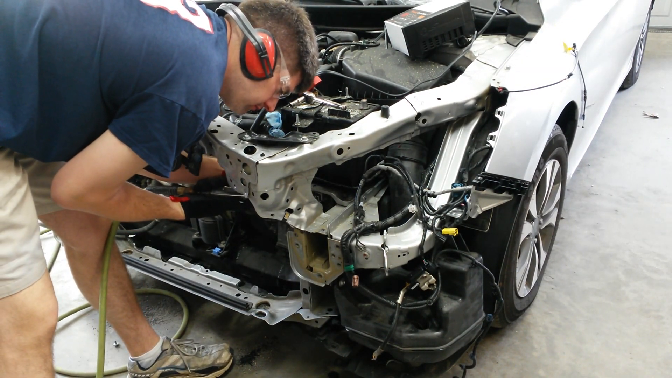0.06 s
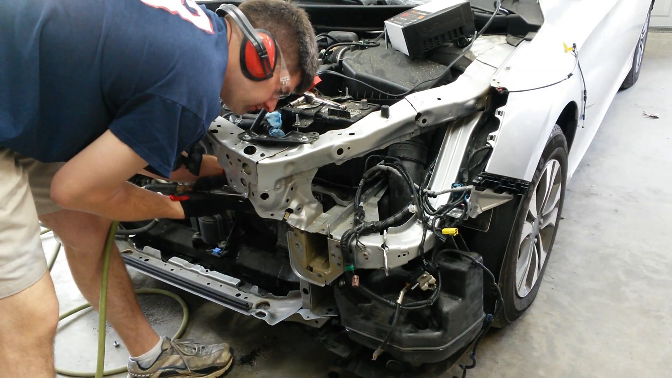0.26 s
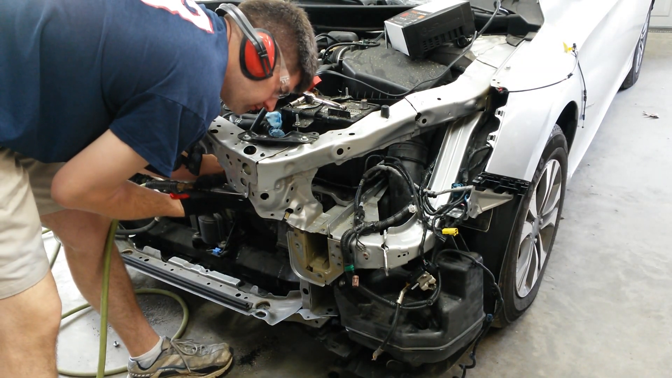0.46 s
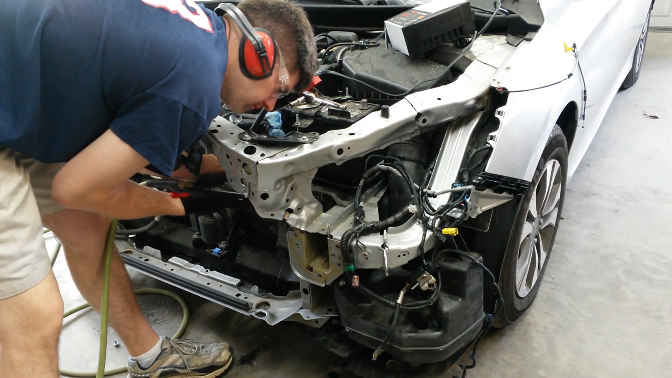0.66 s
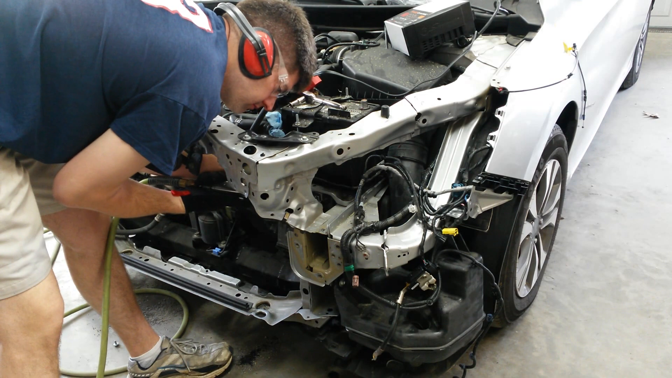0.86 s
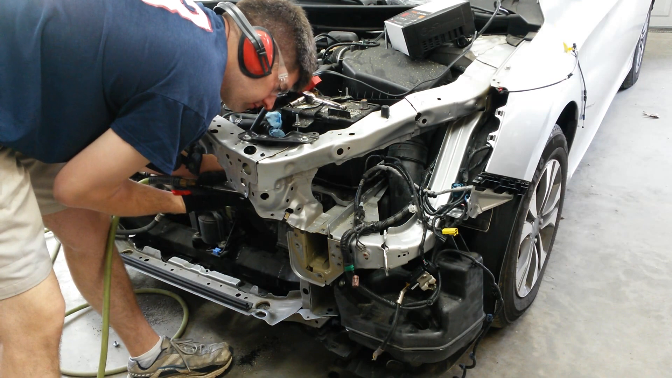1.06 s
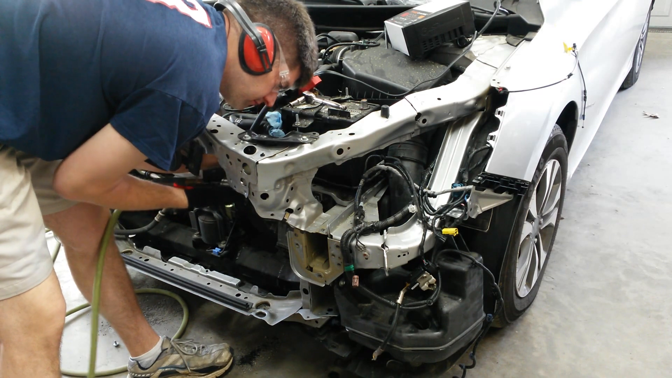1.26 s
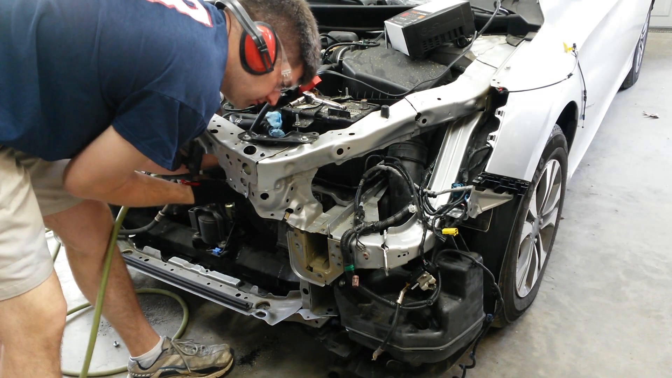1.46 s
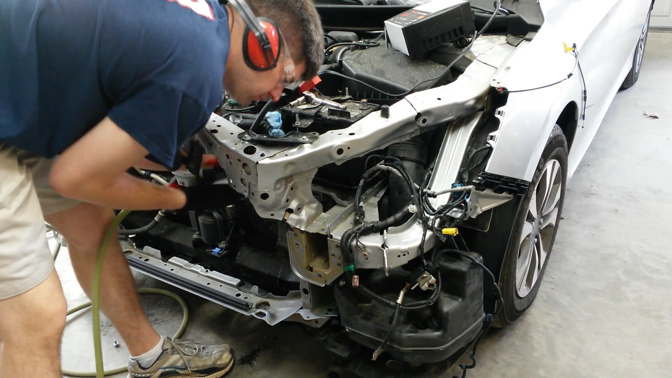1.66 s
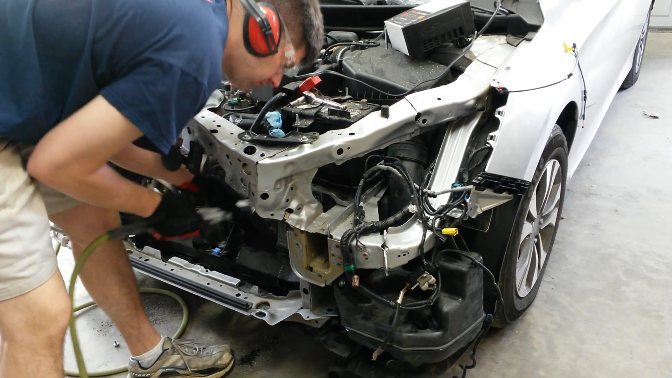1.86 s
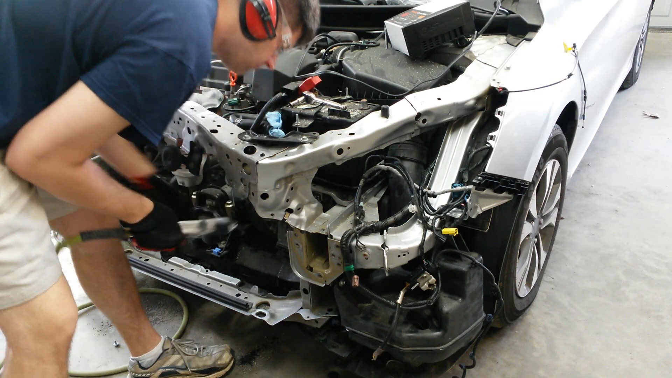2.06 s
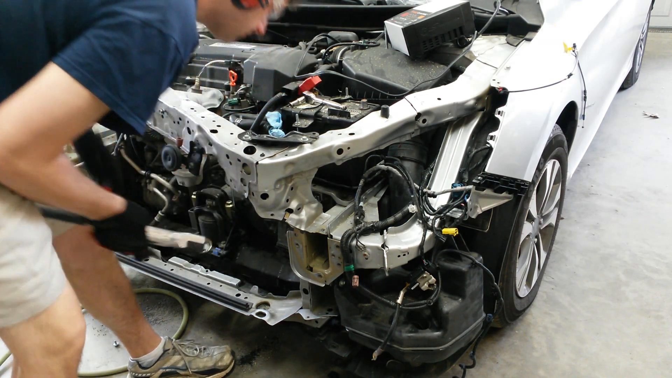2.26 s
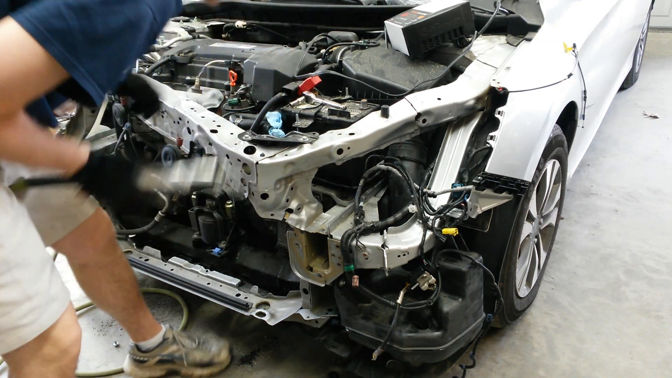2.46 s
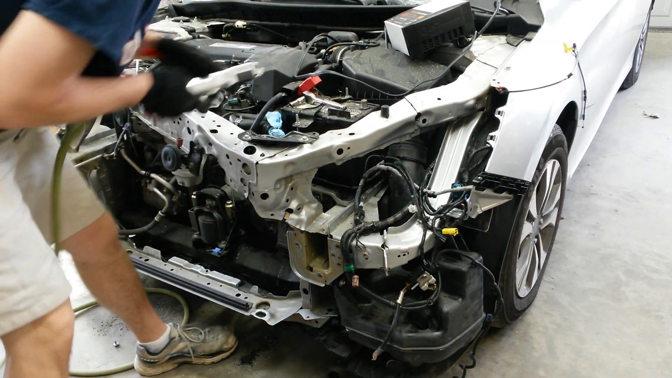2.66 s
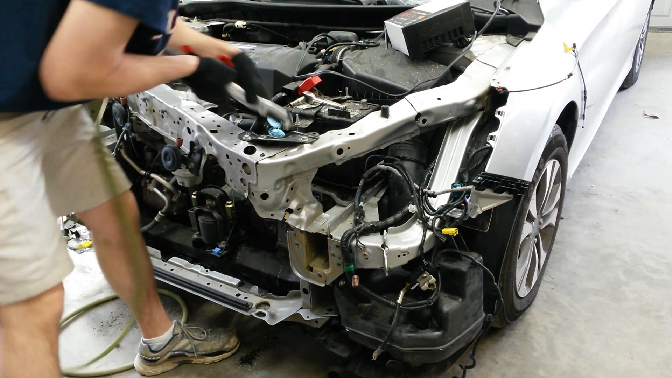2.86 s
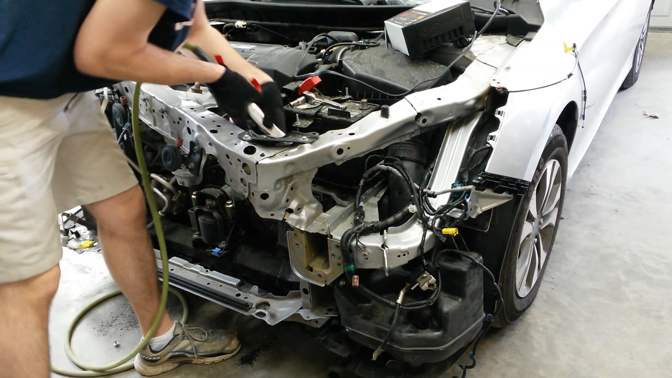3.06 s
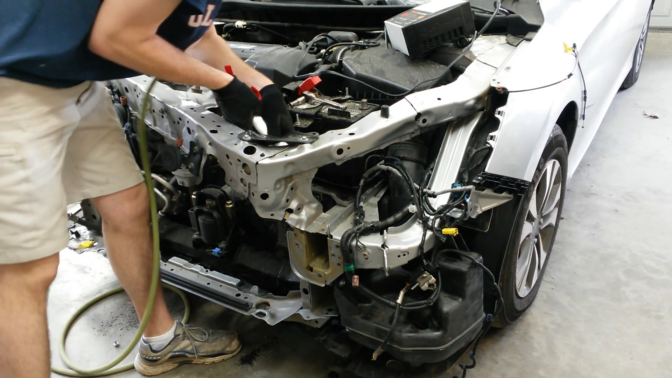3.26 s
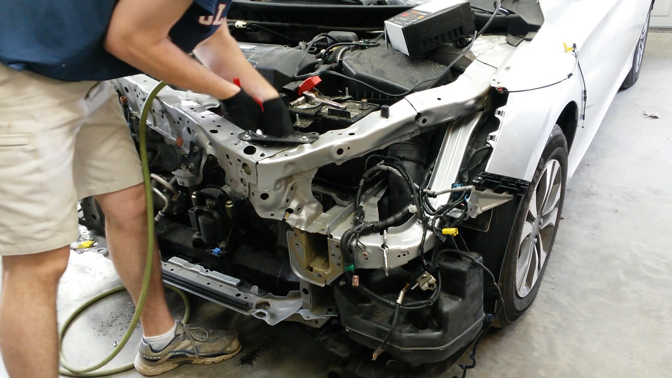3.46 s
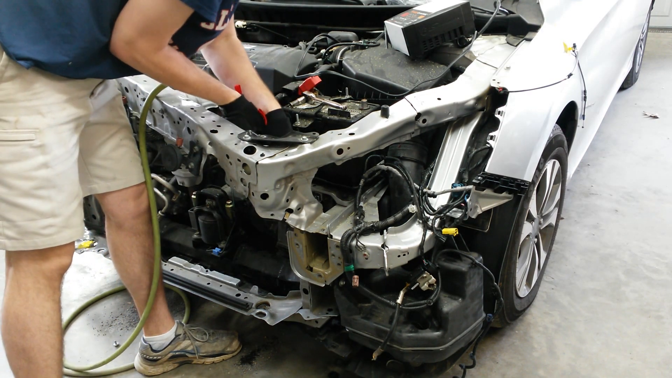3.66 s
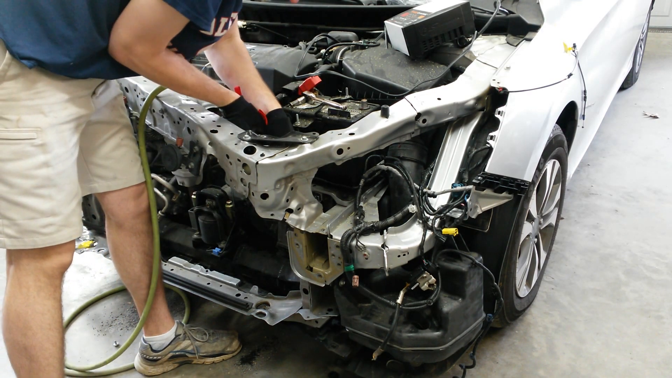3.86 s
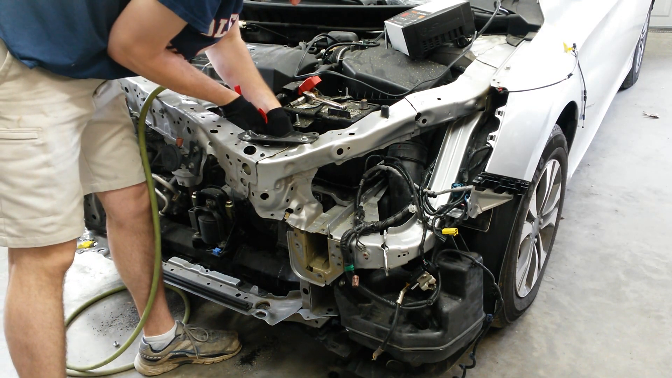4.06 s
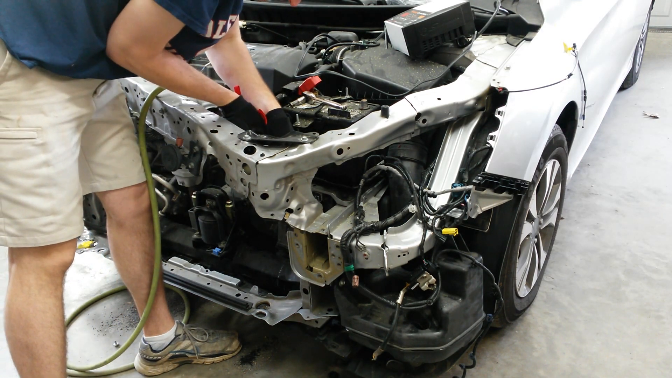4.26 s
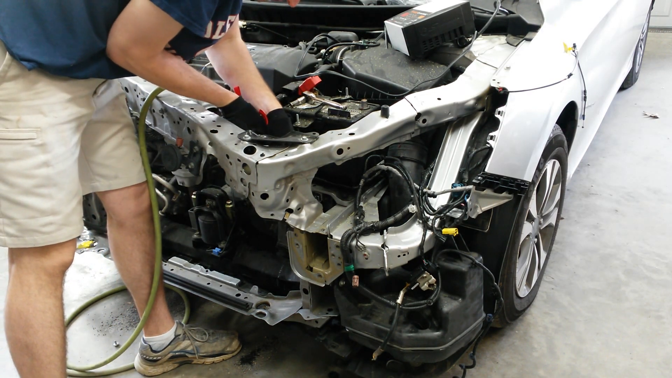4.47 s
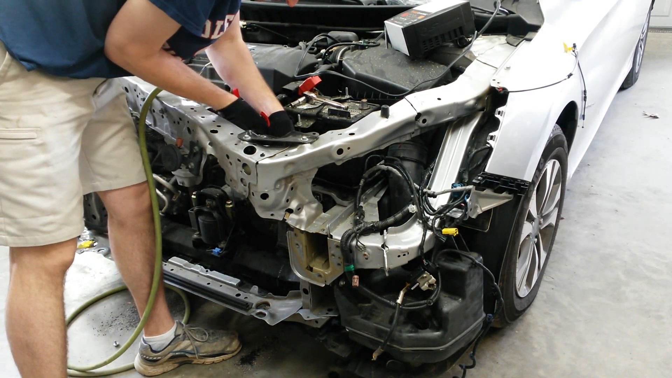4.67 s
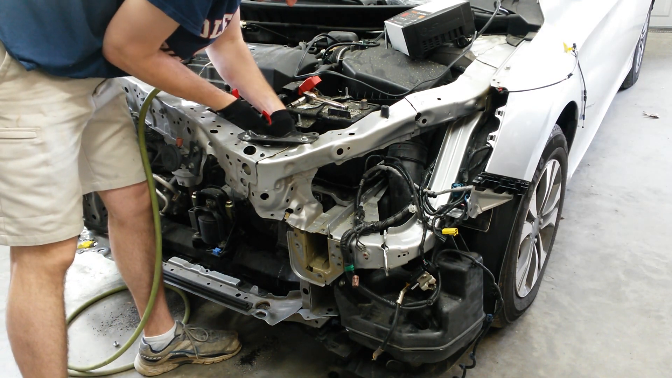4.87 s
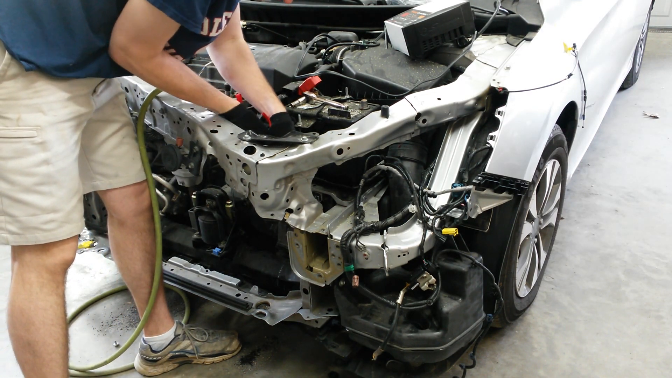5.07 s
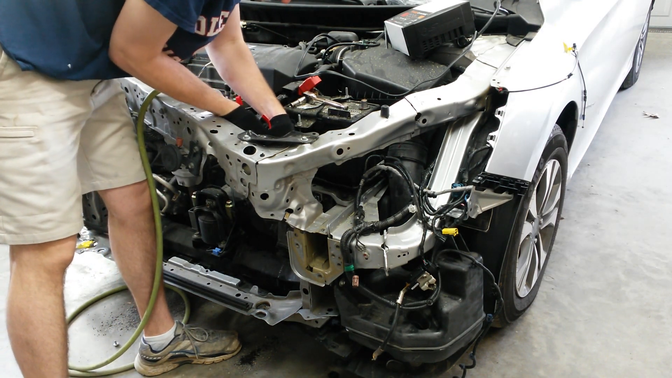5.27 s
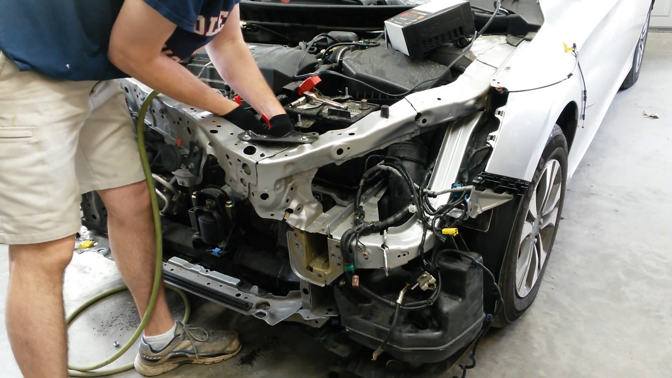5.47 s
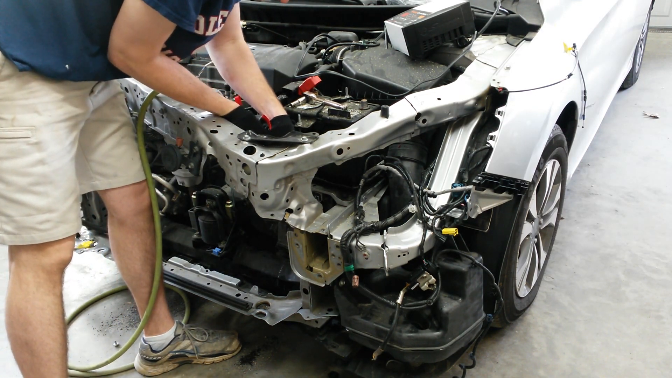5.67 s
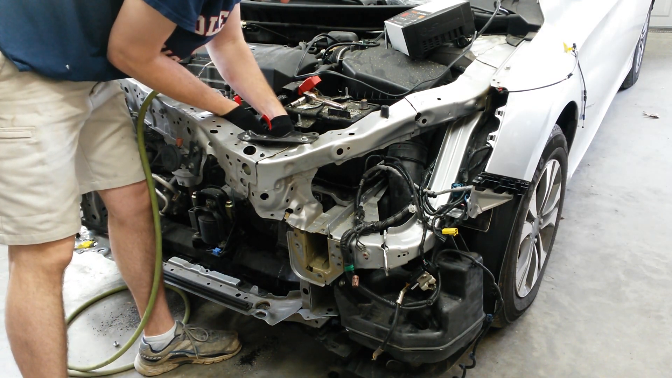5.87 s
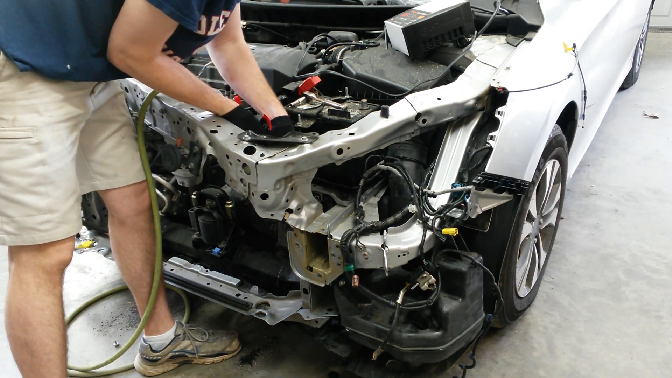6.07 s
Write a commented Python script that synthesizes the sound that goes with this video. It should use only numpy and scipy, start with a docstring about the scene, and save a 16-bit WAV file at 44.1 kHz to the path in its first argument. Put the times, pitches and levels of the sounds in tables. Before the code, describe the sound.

Close up in a hard-walled workshop, an air saw is already cutting sheet steel with a fast, raspy buzz and hissing exhaust. It is released, and a compressor's hum, throbbing rumble and hiss swell up. Small air leaks and dull metal knocks follow, then a brief blip with a clank, and a second, slower, harsher cut runs to the end.

```python
"""An air-driven reciprocating saw on the sheet steel of a car front, heard close up in a hard-walled workshop.
A cut is already running: every stroke puffs exhaust, knocks the piston and drags the teeth, with an air jet.
It is let go; the compressor's hum, throbbing rumble and hiss swell back, and the throttle leaks air.
The tool knocks on the body, leaks twice more, and is blipped once with a clank of its housing.
A second, slower cut follows, with spells of strong stroke partials, and the background sinks again."""
import sys
import numpy as np
from scipy import signal
from scipy.fft import rfft, irfft, next_fast_len
from scipy.io import wavfile
from scipy.ndimage import uniform_filter1d, minimum_filter1d

SR = 44100
rng = np.random.default_rng(int(sys.argv[2]) if len(sys.argv) > 2 else 0)


def unload_audio(sound):
    """Save the sound as a 16-bit wav file, at the path given as the first command line argument."""
    columns = np.transpose(np.atleast_2d(sound))
    # keep every value between -1 and 1, then stretch to whole-number steps
    steps = np.round(np.clip(columns, -1, 1) * 32767)
    wavfile.write(sys.argv[1], SR, steps.astype(np.int16))


N = 269892
TIME = np.arange(N) / SR

# balance of the tool between the microphones: [f/Hz, left over right/dB]
SAW_PAN = [(60, -7), (91, -8), (140, 14), (210, -1), (320, 1), (490, -4.5), (750, 1.5), (1150, -3.5),
           (1750, 0), (2660, -0.5), (4050, 4), (6000, 4.5), (7100, -7.5), (8100, -17), (9300, -6.5),
           (11000, -1), (14400, -20.5)]
# likeness of the tool at the two microphones: [f/Hz, correlation]
SAW_LIKENESS = [(200, 0.91), (600, 1), (1300, 0.63), (3000, 0.018), (8000, 0.18), (14000, 0.23)]
# the short pull of the trigger: (on/s, let go/s, run-down/dB per s, strokes turn uneven/s);
# the last lies before the pull, so its strokes are uneven throughout
PULL_BLIP = (4.763, 4.825, 420, 4.33)


def from_db(db):
    """Decibels to gain."""
    return 10 ** (np.asarray(db) / 20)


def rms_one(x):
    """Scale to unit power."""
    return x / np.sqrt(np.mean(x ** 2) + 1e-20)


def in_time(rows, t):
    """The columns of a curve at the times t."""
    s, *columns = np.transpose(rows)
    return [np.interp(t, s, c) for c in columns]


def at_hz(points, hz):
    """A table read on a log-frequency axis."""
    table_hz, values = np.transpose(points)
    return np.interp(np.log(hz), np.log(table_hz), values)


def drift(rate, t):
    """Random wander of spread about 1, with `rate` straight pieces per second."""
    knots = rng.standard_normal(1024)
    return np.interp(t * rate, np.arange(len(knots)), knots)


def spell(t, start, length, edge_s):
    """A gain that rises to 1, holds and falls, at half height on the start and the end."""
    return np.clip(np.minimum(t - start, start + length - t) / edge_s + .5, 0, 1)


def shaped(x, gain_at):
    """Filter by a gain given as a function of frequency."""
    size = next_fast_len(x.shape[-1] + 4096)
    hz = np.maximum(np.fft.rfftfreq(size, 1 / SR), 1)
    return irfft(rfft(x, size) * gain_at(hz), size)[..., :x.shape[-1]]


def coloured(x, spectrum):
    """Impose a spectrum that falls 81 dB per octave beyond its ends; unit power."""
    def gain_at(hz):
        octaves_outside = np.abs(np.log2(hz / np.clip(hz, spectrum[0][0], spectrum[-1][0])))
        return from_db(at_hz(spectrum, hz) - 81 * octaves_outside)
    return rms_one(shaped(x, gain_at))


def hiss(spectrum):
    """Two unrelated noises of one colour."""
    return coloured(rng.standard_normal((2, N)), spectrum)


def resonate(x, rings):
    """Parallel resonances (f/Hz, width/Hz, level/dB) with alternating signs; unit power."""
    out = 0
    for k, (hz, width, db) in enumerate(rings):
        r = np.exp(-np.pi * width / SR)
        zeros = np.array([1, 0, -1]) * (1 - r * r) / 2
        poles = [1, -2 * r * np.cos(2 * np.pi * hz / SR), r * r]
        out = out + (-1) ** k * from_db(db) * signal.lfilter(zeros, poles, x)
    return rms_one(out)


def smeared(x, decay_s):
    """Dense modes draw every knock out in time and leave its spectrum even; a pair, unit power."""
    size, age = next_fast_len(len(x) + 4096), TIME[:4096]
    modes = rfft(rng.standard_normal((2, len(age))) * np.exp(-age / decay_s), size)
    return rms_one(irfft(rfft(x, size) * modes / np.abs(modes), size)[:, :len(x)])


def scattered(x, decay_s):
    """Nearby surfaces give each microphone its own fixed pattern of peaks and notches; unit power."""
    age = TIME[:4096]
    paths = rng.standard_normal((2, len(age))) * np.exp(-age / decay_s)
    return rms_one(signal.fftconvolve(x[None], paths, axes=1)[:, :len(x)])


def spread(pair, likeness, pan):
    """Two signals, as middle and side, become left and right with a likeness and balance per frequency."""
    mid = shaped(pair[0], lambda hz: np.sqrt(1 + at_hz(likeness, hz)))
    side = shaped(pair[1], lambda hz: np.sqrt(1 - at_hz(likeness, hz)))

    def balance(hz):
        gains = from_db(np.outer([.5, -.5], at_hz(pan, hz)))
        return gains / np.sqrt(np.mean(gains ** 2, axis=0))
    return shaped(np.array([mid + side, mid - side]), balance)


def delayed_right(pair, lag_s):
    """Sound from one side reaches the right microphone later (or, if negative, earlier)."""
    return np.array([pair[0], shaped(pair[1], lambda hz: np.exp(-2j * np.pi * hz * lag_s))])


def compressor(hum_db, rumble_db, hiss_db, throb_db):
    """Crank partials hum over a rumble throbbing once a turn and a steady hiss, first at the left microphone."""
    # hum: [multiple of the crank rate, relative level/dB]
    partials = [(4, -59), (6, -57), (8, -50), (10, -50), (12, -49), (14, -57), (16, -38.5), (17, -52),
                (18, -43), (19, -39), (20, -38.5), (21, -53), (22, -43.5), (24, -48), (33, -53), (37, -48),
                (39, -51), (40, -52), (42, -36), (45, -49), (49, -53), (50, -53)]
    # colour of the rumble and of the hiss: [f/Hz, relative density/dB per Hz]
    rumble_colour = [(25, -25), (60, -17), (120, -6), (230, -10.5), (330, 4.5), (450, -6.5), (560, -3),
                     (690, 0.5), (900, -8.5), (1300, -28)]
    hiss_colour = [(900, -5), (1200, -10), (1600, -9), (2000, -12.5), (2450, -11), (3350, -1), (4300, -5.5),
                   (5150, 0.5), (5700, -7), (6500, -9), (7800, 0.5), (9000, -13.5), (11200, -30.5),
                   (14800, -33.5)]
    # the noise at the two microphones: [f/Hz, left over right/dB] and [f/Hz, correlation]
    noise_pan = [(60, -6), (110, 4), (200, -1), (370, -1.5), (680, -2), (1260, 1.5), (2310, -3),
                 (4250, 8.5), (7810, -8.5), (9300, -7.5), (11000, -1), (14400, -13)]
    noise_likeness = [(100, 1), (350, 1), (800, 0.28), (2000, 0.28), (5000, 0.054), (14000, 0.03)]
    # background level, low under the saw: [t/s, gain/dB, further gain below 230 Hz/dB]
    background = [(0, -14.5, -15), (.6, -12, -21), (1.4, -8.5, 1), (2.05, -7, 0.5), (2.35, 0.5, 1.5),
                  (2.8, 1, 2), (5.17, 1.5, 2.5), (5.22, -15, -11), (6.12, -31, -16)]
    crank_hz = 16.333

    crank = 2 * np.pi * crank_hz * (TIME - .02) + .012 * drift(5, TIME)
    hum = sum(from_db(db + .8 * drift(4, TIME)) * np.sin(k * crank + rng.normal(0, 1.6))
              for k, db in partials)
    shared_air = scattered(rng.standard_normal(N), decay_s=.028)
    air = coloured(shared_air + .7 * rng.standard_normal((2, N)), hiss_colour)
    rumble = from_db(rumble_db + throb_db * np.cos(crank)) * hiss(rumble_colour)
    noise = spread(rumble + from_db(hiss_db) * air, noise_likeness, noise_pan)
    sound = hum * from_db(hum_db + np.array([[-1], [1]])) + noise
    sound = delayed_right(sound, .00034)
    bass = shaped(sound, lambda hz: 1 / (1 + (hz / 230) ** 12))
    level, bass_level = in_time(background, TIME)
    return from_db(level) * (sound - bass + from_db(bass_level) * bass)


def workshop(x, wet_db):
    """Hard walls return a diffuse tail to each microphone, every band dying at its own rate."""
    # reverberation time: [f/Hz, t60/s]
    shop_t60 = [(100, 0.67), (1000, 0.54), (5000, 0.82), (9000, 0.38), (15000, 0.42)]
    age, tail = TIME[:SR], 0
    edges = np.geomspace(200, 16000, 9)
    for low, high in zip(edges, edges[1:]):
        band_filter = signal.butter(2, [low, high], "band", fs=SR, output="sos")
        band = signal.sosfilt(band_filter, rng.standard_normal((2, len(age))))
        tail = tail + band * from_db(-60 * age / at_hz(shop_t60, np.sqrt(low * high)))
    tail = tail * np.clip(age / 0.0078, 0, 1)  # builds up over 7.8 ms
    tail = rms_one(tail) / np.sqrt(len(age))
    return x + from_db(wet_db) * signal.fftconvolve(x, tail, axes=1)[:, :N]


def leaks():
    """The throttle cracks open and lets a short hiss of turbulent air out."""
    # each leak: [t/s, level/dB, rise/s, decay/s]
    leak_times = [(1.855, -49, .004, .02), (3.21, -33.5, .04, 0.051), (4.3, -29, 0.0078, 0.016)]
    # [f/Hz, relative density/dB per Hz]
    leak_colour = [(2000, -15), (4000, -12), (6500, -6.5), (8000, 1.5), (10000, -12.5), (14500, -18)]
    flow = 0
    for s, db, rise, decay in leak_times:
        fall = np.maximum((s - TIME) / rise, (TIME - s) / decay)
        flow = flow + from_db(db) * np.exp(-fall.clip(0, 30))
    return flow * spread(hiss(leak_colour), SAW_LIKENESS, SAW_PAN)


def body_knocks(clunk_db):
    """Each touch gives a dull clunk and rings the modes of the car front with new strengths."""
    # each touch: [t/s, peak level ahead of the room/dB, brightness of the contact/Hz]
    touches = [(3.136, -37, 1100), (3.153, -34, 1250), (3.471, -25, 1900), (3.494, -35, 1900),
               (4.299, -39, 1500)]
    # modes of the car front: [f/Hz, relative level/dB, t60/s]
    body_modes = [(1100, 0, .1), (1157, -1.5, 0.11), (1350, -4, .15), (1384, 0.5, 0.17), (1450, -6, .17),
                  (1560, 1, .17), (1626, -9, .14)]
    out, age = np.zeros((2, N)), TIME[:SR // 2]
    clunk_band = signal.butter(2, [1000, 1650], "band", fs=SR, output="sos")
    for s, db, top_hz in touches:
        ring = 0
        for hz, mode_db, t60 in body_modes:
            level = from_db(mode_db + rng.normal(0, 3.5, (2, 1)) - 60 * age / t60)
            ring = ring + level * np.sin(2 * np.pi * hz * age) * rng.choice([-1, 1])
        burst = rng.standard_normal((2, len(age))) * np.exp(-age / 0.018)
        clunk = signal.sosfilt(clunk_band, burst)
        blow = rms_one(ring) + from_db(clunk_db) * rms_one(clunk)
        blow = signal.sosfilt(signal.butter(4, top_hz, fs=SR, output="sos"), blow)
        at = int(s * SR)
        out[:, at:at + len(age)] += from_db(db) * blow / np.abs(blow).max()
    return out


def housing_clank():
    """The jolt of the blip sets the metal housing ringing while the piston rattles out."""
    # resonances of the housing: [f/Hz, width/Hz, relative level/dB]
    housing = [(3230, 300, 0), (4260, 130, 0), (6460, 130, 0), (8050, 280, -3), (9080, 120, 0.5)]
    level_db, decay_s = -22.5, .04
    age = TIME - PULL_BLIP[0]
    rattling = rng.standard_normal((2, N)) * (age > 0) * np.exp(-np.abs(age) / decay_s)
    # the factor makes the level hold near the onset rather than as a mean over the scene
    ring = resonate(rattling, housing) * np.sqrt(decay_s / 2 / TIME[-1])
    return from_db(level_db) * ring


def blip_effort():
    """Air spurts and fades while the teeth brush the steel once: (t/s, air/dB, rattle/dB, bite/dB)."""
    air_db, fade_db_per_s = -20.5, 260
    snap_db, snap_s = 8, 0.0085  # extra spurt as the valve snaps open
    brush_at_s, brush_width_s, brush_db, brush_rise_db = 4.815, 0.019, -37.5, 8.5
    age = TIME[:SR // 4]
    t = PULL_BLIP[0] + age
    air = air_db - fade_db_per_s * age + snap_db * np.exp(-age / snap_s)
    bite = brush_db + brush_rise_db * np.exp(-((t - brush_at_s) / brush_width_s) ** 2)
    return np.transpose([t, air, air, bite])


def low_tones(t, turn):
    """Low tones near one to two times the stroke rate swell, hold and fade."""
    # each low tone: [t/s, length/s, multiple of the stroke rate, level/dB]
    tones = [(0.775, 0.056, 1, -52.5), (0.895, 0.4, 1, -52), (1.241, 0.05, 2.05, -31),
             (5.245, .04, 1.8, -44.5), (5.335, 0.26, 2, -43), (5.65, 0.12, 2, -43.5),
             (5.82, 0.055, 1.35, -43.5), (5.905, 0.036, 1.55, -46), (5.991, 0.034, 1.25, -45.5),
             (6.052, 0.037, 1.8, -43)]
    total = 0
    for s, length, multiple, db in tones:
        level = from_db(db + 3.0 * drift(22, t)) * spell(t, s, length, edge_s=0.012)
        total = total + level * np.sin(multiple * turn + drift(25, t))
    return total


def partial_spells(t, turn, rate):
    """In spells the stroke's partials near one frequency swell, hold and fade."""
    # each spell: [t/s, length/s, centre f/Hz, half width/Hz, strokes per period, level/dB]
    spells = [(.08, .3, 1740, 130, 1, -42), (5.25, .5, 3020, 170, 2, -33), (.2, .09, 5400, 70, 1, -34),
              (.22, .08, 4460, 70, 1, -36), (.22, .17, 740, 50, 1, -37.5), (0.256, 0.28, 960, 150, 1, -35),
              (0.462, 0.31, 953, 25, 2, -42), (.48, 0.27, 1098, 25, 2, -37.5),
              (.45, 0.32, 1260, 80, 2, -39.5), (0.625, 0.3, 728, 50, 1, -40.5),
              (.82, 0.18, 861.6, 319.5, 1, -37), (0.777, 0.43, 1290, 130, 2, -39.5),
              (4.795, 0.055, 740, 200, 2, -30.5), (5.223, 0.11, 1305, 50, 1, -31),
              (5.265, 0.11, 595, 100, 1, -32.5), (5.33, .27, 750, 90, 1, -36),
              (5.37, 0.088, 1300, 50, 1, -32.5), (5.53, 0.22, 1300, 50, 1, -27),
              (5.6, 0.54, 378, 50, 1, -43.5), (5.68, .2, 1773, 40, 1, -31.5),
              (5.78, 0.35, 1265, 30, 1, -27), (5.83, .29, 1359, 70, 2, -29),
              (5.8, 0.25, 1615, 60, 2, -25.5), (5.97, .14, 868, 40, 1, -34),
              (5.98, .14, 1840, 80, 1, -28.5)]
    waver_db, slip_rad = 3, 0.56
    sides = np.array([[0], [np.pi / 2]])
    out = np.zeros((2, len(t)))
    for s, length, hz, width, strokes, db in spells:
        swell = spell(t, s, length, edge_s=0.042)
        on = swell > 0
        if not on.any():
            continue
        apart = np.mean(rate[on]) / strokes  # spacing of the partials, Hz
        lowest = max(round((hz - 2 * width) / apart), 1)
        highest = round((hz + 2 * width) / apart)
        tone = 0
        for k in range(lowest, highest + 1):
            level = from_db(waver_db * drift(18, t[on])) / (1 + ((k * apart - hz) / width) ** 4)
            phase = k * turn[on] / strokes + slip_rad * drift(45, t[on]) + rng.uniform(0, 2 * np.pi)
            tone = tone + level * np.sin(phase + sides)
        out[:, on] += from_db(db) * swell[on] * rms_one(tone)
    return out


def exhaust_puffs(t, turn, uneven, even, exhaust):
    """The exhaust port opens once a stroke; its partials waver as the tool shifts; a pair, unit power."""
    waver_db = 2 + 3 * uneven
    puffs = np.zeros((2, len(t)))
    for side in puffs:
        for k, db in enumerate(exhaust, 2):  # from twice the stroke rate upwards
            level = from_db(db + waver_db * np.minimum(drift(14, t), 1))
            wander = (1.2 - even) * drift(24, t)
            side += level * np.sin(k * turn + wander + rng.uniform(0, 2 * np.pi))
    return rms_one(puffs)


def piston_knocks(t, stroke, even):
    """The piston hits its end stop; every knock rings dense modes, whose mix shifts with the grip."""
    strength = from_db(2.8 * (1 - even) * rng.standard_normal(len(t)))
    knocks = np.diff(np.floor(stroke), prepend=0) * strength
    shifting = drift(12, t) * smeared(knocks, decay_s=0.0028)
    return rms_one(smeared(knocks, decay_s=0.0031) + .5 * shifting)


def tooth_snags(t, turn):
    """Teeth snag in grains of uneven size, a little harder on the pulling stroke."""
    grains = rng.standard_normal((2, len(t))) * from_db(4.7 * rng.standard_normal(len(t)))
    return rms_one(grains * from_db(1.3 * np.cos(turn) + 1.3 * drift(130, t)))


def air_jet(t, turn):
    """Turbulent air that pulses once and twice a stroke."""
    pulse_db = 1.4 * np.cos(turn) + 1.6 * np.cos(2 * turn) + 2.0 * drift(60, t)
    return rng.standard_normal((2, len(t))) * from_db(pulse_db)


def saw(pull, speed, effort, exhaust, panel, rings, tone_db, bite_db, ring_db, rattle_db, jet_db, jitter):
    """One pull of the trigger: puffs, piston, teeth on steel and air jet over one stroke clock."""
    # colour of the piston rattle and of the air jet: [f/Hz, relative density/dB per Hz]
    rattle_colour = [(1470, -9.5), (2300, -4.5), (2600, -5.5), (3060, 0), (3300, -0.5), (3640, -1.5),
                     (3880, -2.5), (4760, -1), (5350, -1), (5800, -4.5), (6520, -6), (6800, -3),
                     (8840, -10.5), (15000, -120)]
    jet_colour = [(3650, -20), (6200, -10), (6520, -10), (7460, -2), (7910, 1), (8640, -5.5), (9250, -10.5),
                  (10900, -16.5), (12300, -16), (14000, -20.5), (14800, -39)]
    uneven_tone_db = -3  # the exhaust tone is weaker once the strokes are uneven
    even_bite_db = -2.5  # the bite is weaker while they are even

    on, off, run_down, uneven_at = pull
    active = (TIME > on) & (TIME < off + 60 / run_down)
    t = TIME[active]
    rate, = in_time(speed, t)
    flow, rattle, bite = in_time(effort, t)
    uneven = np.clip((t - uneven_at) / .08 + .5, 0, 1)  # turns over 80 ms
    even = 0.85 - 0.68 * uneven  # evenness of the strokes
    stroke = np.cumsum(rate * (1 + jitter * drift(90, t))) / SR
    turn = 2 * np.pi * stroke

    clatter = piston_knocks(t, stroke, even)
    force = np.sqrt(even) * clatter + np.sqrt(1 - even) * tooth_snags(t, turn)
    steel = coloured(force, panel) + from_db(ring_db) * resonate(force, rings)

    sound = from_db(tone_db + uneven_tone_db * uneven) * exhaust_puffs(t, turn, uneven, even, exhaust)
    sound += from_db(bite + bite_db + even_bite_db * (1 - uneven)) * steel
    sound[0] += low_tones(t, turn)  # in the middle signal only
    sound += partial_spells(t, turn, rate)
    sound += from_db(rattle + rattle_db + 1.56 * drift(25.07, t)) * coloured(force, rattle_colour)
    sound += from_db(flow + jet_db) * coloured(air_jet(t, turn) + 0.46 * clatter, jet_colour)

    valve = np.clip((t - on) / 0.0029, 0, 1) * from_db(-run_down * np.maximum(t - off, 0))
    out = np.zeros((2, N))
    out[:, active] = spread(sound, SAW_LIKENESS, SAW_PAN) * valve
    return out


def scene():
    """Two cuts, a blip and the handling between them, in the workshop, with the compressor behind."""
    # exhaust partials in each grip, from twice the stroke rate upwards: [relative level/dB]
    exhaust_one = [2.5, -2.5, -1.5, -2.5, 3, -2, -2.5, -5, -10, -4.5, -1, -1.5, -6.5]
    exhaust_two = [-22.5, -11.5, -5.5, -3.5, -1, -1, -2, -10, -2.5, -12, -0.5, -6, -10]
    # colour of the steel at each cutting place: [f/Hz, relative density/dB per Hz]
    panel_one = [(210, -31), (350, -13), (574, -0.5), (686, 2.5), (742, -3), (797, 3.5), (1280, -2.5),
                 (1390, -3), (2900, -12.5), (3770, -54), (6380, -120)]
    panel_two = [(280, -51), (480, -22), (639, -10), (699, -17), (754, -6), (1170, -3), (1280, -6.5),
                 (2020, -5), (2900, -6), (3770, -56), (6380, -120)]
    # resonances of the steel at each place: [f/Hz, width/Hz, relative level/dB]
    rings_one = [(734, 40, 0), (890, 48, 1), (1100, 240, 0), (1300, 36, 1)]
    rings_two = [(750, 99, -11.5), (883, 36, -4.5), (1300, 61, 3.5), (1610, 55, 8), (1756, 45, -2.5),
                 (1904, 40, 2), (3020, 140, -8)]
    # the stroke rate sags and wavers during each cut: [t/s, strokes per s]
    speed_one = [(0, 152.2), (.1, 149.5), (.2, 149), (.32, 147.6), (.42, 148), (.52, 147), (.72, 146.3),
                 (.82, 144), (1.0, 145), (1.15, 146), (1.25, 148)]
    speed_two = [(5.22, 126), (5.28, 131.5), (5.41, 128.6), (5.46, 130.4), (5.56, 127.5), (5.61, 131.5),
                 (5.66, 126.4), (5.76, 126.8), (5.82, 124), (5.89, 127), (5.97, 125.8), (6.01, 123.3),
                 (6.05, 125.6), (6.12, 125.6)]
    # how hard the saw works: [t/s, air jet/dB, piston rattle/dB, tooth bite/dB], all relative
    effort_one = [(0.016, -20.5, -23, -27.5), (0.16, -21, -26, -37), (0.22, -20.5, -20.5, -41),
                  (0.33, -21.5, -26, -32), (.45, -20, -25, -27), (0.714, -20.5, -29, -29.5),
                  (1.16, -21, -29, -27), (1.234, -21.5, -26.5, -25), (1.26, -27, -35, -25.5)]
    effort_two = [(5.222, -18, -19.5, -29), (5.23, -11.5, -19.5, -22.5), (5.338, -18.5, -23, -23),
                  (5.45, -22.5, -22.5, -27), (5.672, -11.5, -15.5, -16.5), (5.738, -18, -22, -21.5),
                  (5.848, -14, -18.5, -19.5), (5.968, -17, -23, -18), (6.052, -14.5, -16, -17.5),
                  (6.12, -16, -24, -22)]
    # pulls of the trigger: (on/s, let go/s, run-down/dB per s, strokes turn uneven/s)
    pull_one = (-0.0051, 1.3084, 250, 0.3)
    pull_two = (5.206, 6.2, 250, 5.23)

    background = compressor(hum_db=1.5, rumble_db=-41.5, hiss_db=-37.5, throb_db=2.0)
    handling = leaks() + body_knocks(clunk_db=-2.0) + housing_clank()
    first = saw(pull_one, speed_one, effort_one, exhaust_one, panel_one, rings_one, tone_db=-35.5,
                bite_db=-10, ring_db=-7.5, rattle_db=-2, jet_db=-2.0, jitter=.002)
    # the blip hardly gets the piston going: 95.2 strokes per s
    blip = saw(PULL_BLIP, [(0, 95.2)], blip_effort(), exhaust_two, panel_one, rings_two, tone_db=-40,
               bite_db=-0.5, ring_db=-3.0, rattle_db=-6.0, jet_db=-3.5, jitter=.03)
    second = saw(pull_two, speed_two, effort_two, exhaust_two, panel_two, rings_two, tone_db=-27.5,
                 bite_db=-7.5, ring_db=0, rattle_db=-1, jet_db=-0.35, jitter=.006)
    tool = delayed_right(handling + first + blip + second, -.00005)
    return background + workshop(tool, wet_db=-2.5)


def record(dry):
    """The recorder's fast limiter holds the very highest peaks down; the top is cut."""
    ceiling, hold_s, cutoff_hz = .97, .004, 14650
    size = int(hold_s * SR)
    gain = np.minimum(1, ceiling / (np.abs(dry) + 1e-9))
    gain = uniform_filter1d(minimum_filter1d(gain, size), size)
    top_cut = signal.ellip(10, .2, 70, cutoff_hz, fs=SR, output="sos")
    return signal.sosfilt(top_cut, dry * gain)


dry = scene()
out = record(dry)
unload_audio(out)
```